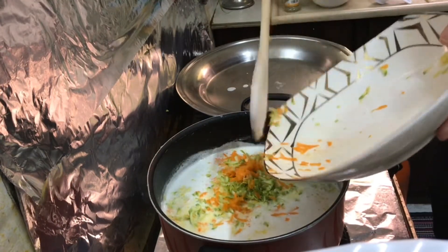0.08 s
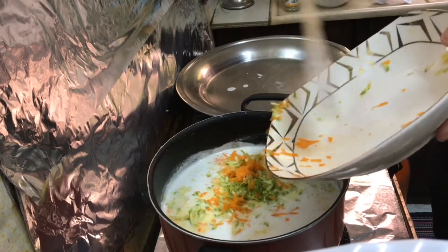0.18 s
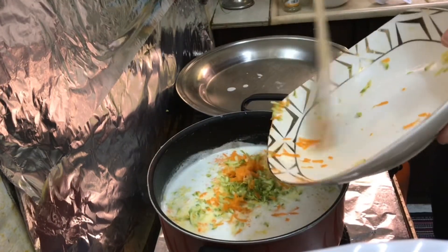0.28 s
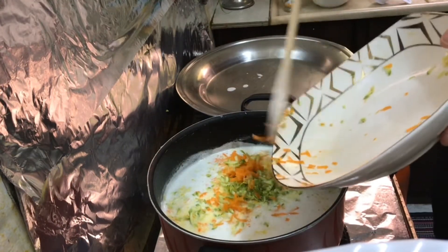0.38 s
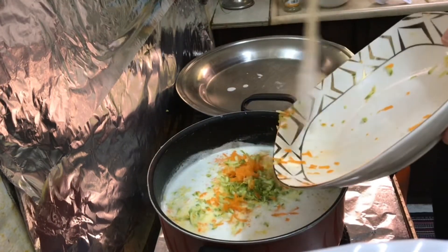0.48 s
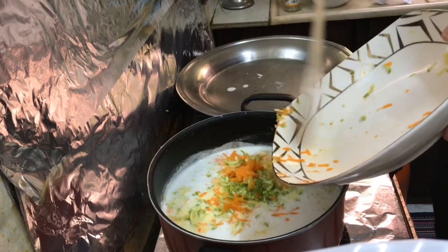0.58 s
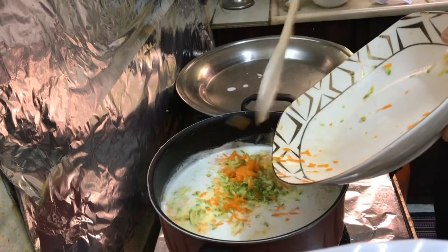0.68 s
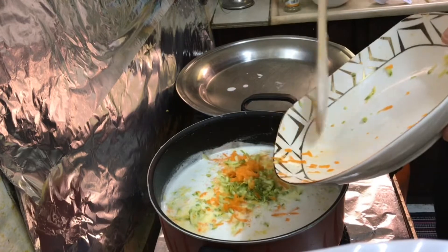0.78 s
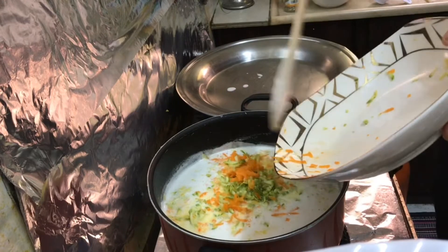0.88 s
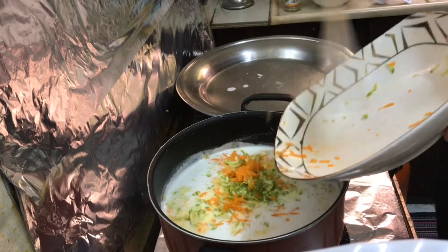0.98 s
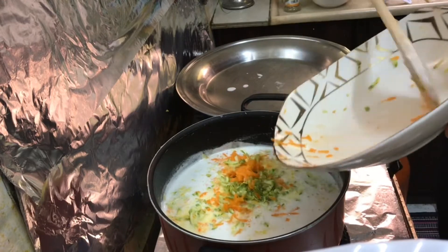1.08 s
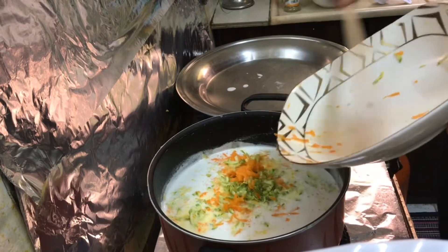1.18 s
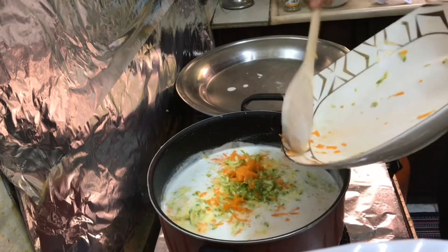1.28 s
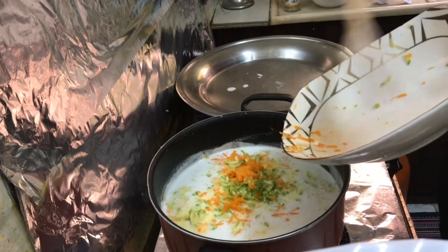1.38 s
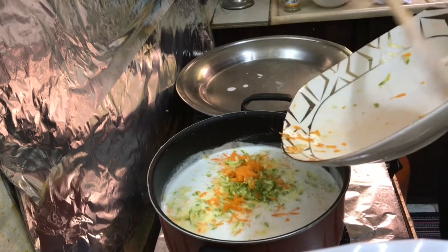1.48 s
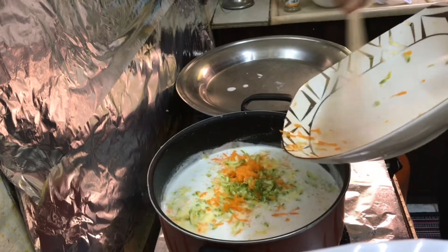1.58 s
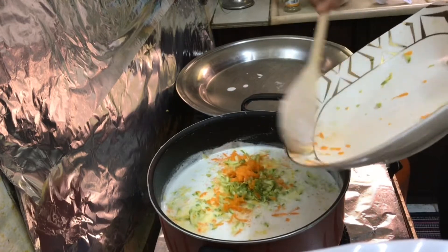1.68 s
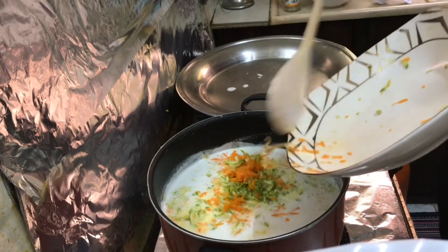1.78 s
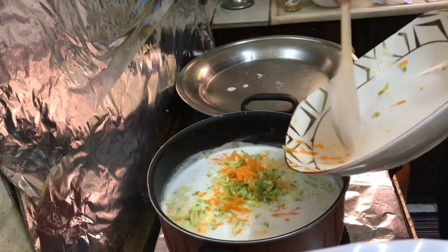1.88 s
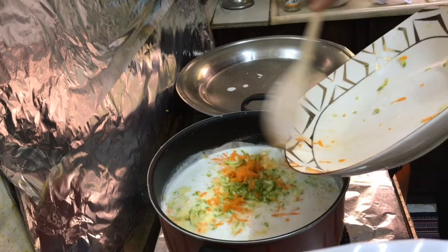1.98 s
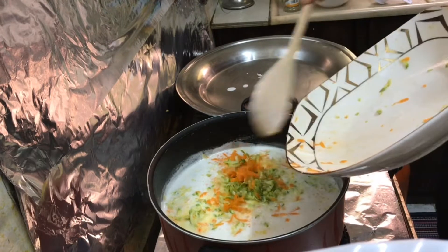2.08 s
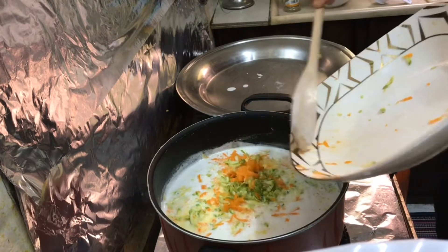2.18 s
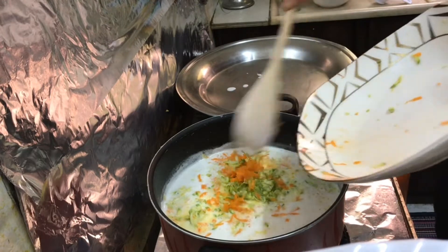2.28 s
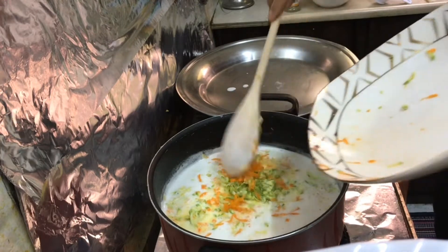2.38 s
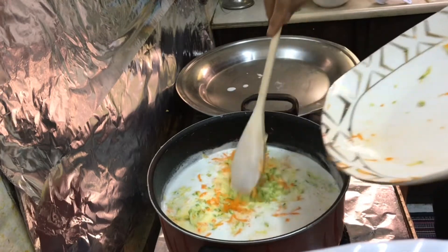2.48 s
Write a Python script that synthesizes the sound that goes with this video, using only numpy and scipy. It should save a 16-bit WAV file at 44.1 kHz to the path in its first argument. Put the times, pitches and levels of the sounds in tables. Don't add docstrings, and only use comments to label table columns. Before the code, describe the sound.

Seven hard knocks of a wooden spoon on a ceramic bowl in a small humming kitchen

```python
import sys
import numpy as np
from scipy import signal
from scipy.fft import rfft, irfft
from scipy.io import wavfile
from scipy.ndimage import uniform_filter1d

SR = 44100
rng = np.random.default_rng(int(sys.argv[2]) if len(sys.argv) > 2 else 0)


def transcribe(signal):
    frames = np.atleast_2d(signal).T
    limited = np.clip(frames, -1, 1)
    pcm = np.round(limited * 32767).astype(np.int16)
    wavfile.write(sys.argv[1], SR, pcm)


def to_linear_factor(level_db):
    exponent = np.asarray(level_db, float) / 20
    return 10 ** exponent


N = 110250

# f/Hz, level/dB rms, wobble/dB
HUM = [(59.3, -55, 2.5), (120.0, -41, .7)]
# f/Hz, width/Hz, level/dB rms
DUCT = [(142, 16, -54), (404, 32, -55), (520, 60, -60), (716, 40, -64)]
# f/Hz, level/dB per Hz
AIR = [(94, 2), (160, 3), (308, -6), (411, -0.5), (453, -1), (719, -7), (942, -12), (1960, -17),
       (16000, -40)]
# t/s, level/dB of the low, middle and high family
TAPS = [
    (.2360, -19, -35.5, -43),
    (.5490, -35, -33, -43.5),
    (0.7939, -48.5, -53, -56.5),
    (1.044, -25, -30, -37),
    (1.455, -35.5, -46.5, -42),
    (1.9062, -27.5, -26, -42.5),
    (2.1632, -26, -35, -43.5),
]
# level/dB of the first, second, third, middle and high family
RIM = [(-44.5, -49.5, -28, -46.5, -39), (-37.5, -35.5, -39, -40, -60), (-43.5, -42, -52, -48, -73),
       (-41.5, -41, -54, -32, -63), (-41, -48, -31, -28, -33.5), (-51, -52, -52, -40, -39),
       (-33, -25.5, -24, -22.5, -29.5)]
# crack level/dB, crack top f/Hz, contact/ms
CONTACT = [(-10.5, 3800, 1.27), (-14, 6900, 0.68), (-26, 7000, 0.31), (-16, 8700, 0.77),
           (-13.5, 5300, 0.83), (-23.5, 8300, 0.82), (-19, 11500, 1.54)]
# thud f/Hz, thud level/dB, knock level/dB, clack level/dB
SPOON = [(727, -15, -16, -14.5), (729, -15, -12.5, -4.5), (638, -19.5, -15.5, -30), (630, -20.5, -30, -12),
         (656, -16.5, -21.5, -46), (719, -17.5, -15.5, -48), (674, -9, -15.5, -19)]
# f/Hz, t60/s
BOWL = [
    [(2278, .24), (2302, .24), (2326, .27), (2350, .2), (2398, .12), (2482, .17), (2579, .13)],
    [(3020, .12), (3605, .15), (3714, .2), (3756, .15), (3792, .2), (3820, .27), (3854, .2)],
    [(5717, .16), (6026, .16), (6058, .2), (6640, .1), (7040, .14), (8436, .12), (9260, .12), (9540, .15)],
    [(1147, .2), (1180, .5), (1188, .3)],
    [(1782, .2), (1804, .33), (1837, .22)],
    [(2480, .1), (2530, .33)],
    [(3398, .15), (3428, .24), (3512, .12), (4417, .24)],
    [(5368, .1), (5402, .12), (5575, .17), (8157, .13), (11100, .1), (12700, .08)],
]
BOWL_SHARE = [
    [-3, -2, -2, -7, -8, -6, -12],
    [-10, -13, -7, -11, -6, 0, -9],
    [-5, -5, 0, -8, -10, -12, -14, -16],
    [-8, 0, -4],
    [-8, 0, -6],
    [-2, 0],
    [-12, 0, -18, -12],
    [-4, 0, -7, -6, -22, -20],
]
# extra level/dB, t60/s
FIRST_SWING = [(8, 0.071), (11, 0.049), (8.5, 0.055), (14.5, 0.021), (10, 0.014), (-7, .04), (-0.5, 0.11),
               (15.5, 0.013)]
# f/Hz, level/dB, t60/s
SPOON_KNOCK = [(362, -12, .07), (870, -4, .04), (1250, -2, .022), (1480, 0, .02)]
SPOON_CLACK = [(3050, -1, .016), (3450, -1, .015), (3900, -5, .012), (5300, -11, .015), (7400, -11, .012)]
# t/s, level/dB
GRAZES = [
    (.7685, -52),
    (1.873, -59),
    (2.1450, -49),
]
# f/Hz, width/Hz, level/dB, t60/s
KITCHEN = [(285, 600, -7, 0.12), (702, 690, -2.5, 0.26), (570, 58, 3.5, 0.24), (1296, 760, -9.5, .33),
           (2400, 1400, -15, .3), (5180, 4240, -7, 0.26), (10400, 6600, -9, 0.2), (14640, 6000, -43, 0.067)]
# f/Hz, width/Hz, depth/0-1
MIC_DIPS = [(1020, 220, .5), (2000, 200, .3), (10500, 1500, .35)]


def level(x, db):
    return x * to_linear_factor(db) / np.sqrt(np.mean(x ** 2))


def band(x, hz, width):
    edges = [max(hz - width / 2, 5), min(hz + width / 2, SR / 2.1)]
    return signal.sosfilt(signal.butter(2, edges, "bandpass", fs=SR, output="sos"), x)


def walk(rate):
    hold = int(SR / rate)
    steps = np.repeat(rng.standard_normal(N // hold + 1), hold)
    return 1.5 * uniform_filter1d(uniform_filter1d(steps, hold), hold)[:N]


def add(out, x, at_s):
    i = int(at_s * SR)
    out[i:i + len(x)] += x[:len(out) - i]


def fan_hum():
    t = np.arange(N) / SR
    out = np.zeros(N)
    for hz, db, wobble_db in HUM:
        strength = np.sqrt(2) * to_linear_factor(db + wobble_db * walk(9))
        out += strength * np.sin(2 * np.pi * hz * t + .3 * walk(6))
    return out


def fan_duct():
    out = sum(level(band(rng.standard_normal(N), hz, width), db) for hz, width, db in DUCT)
    rumble = band(band(rng.standard_normal(N), 71.3, 53), 71.3, 52)
    return out + level(rumble, -57)


def fan_air():
    flicker_db = 1.0
    hz = np.fft.rfftfreq(N, 1 / SR)
    at_hz, air_db = np.array(AIR).T
    shape = to_linear_factor(np.interp(np.log(hz + 1), np.log(at_hz), air_db))
    shape = shape * np.minimum(hz / 130, 1) ** 3
    octave = np.log2(np.maximum(hz, 100) / 100)
    air = np.zeros(N)
    for k in range(9):
        share = np.sqrt(np.clip(1 - abs(octave - k), 0, 1))
        noise = irfft(rfft(rng.standard_normal(N)) * shape * share, N)
        air += to_linear_factor(flicker_db * walk(7.96)) * noise
    return level(air, -44.5)


def fan():
    return fan_hum() + fan_duct() + fan_air()


def crack(t, db, top_hz):
    t60_s = 0.028
    burst = rng.standard_normal(len(t)) * to_linear_factor(db - 60 * t / t60_s)
    return signal.lfilter(*signal.butter(1, [700, min(top_hz, 18000)], "bandpass", fs=SR), burst)


def ring(modes, db, t, first=(-99, .01)):
    scatter_db = 1
    hz, mode_db, t60 = np.array(modes).T[:, :, None]
    gain = to_linear_factor(db + mode_db + scatter_db * rng.standard_normal(hz.shape))
    first_db, first_t60 = first
    fade = to_linear_factor(-60 * t / t60) + to_linear_factor(first_db - 60 * t / first_t60)
    return np.sum(gain * np.sin(2 * np.pi * hz * t) * fade, axis=0)


def wood(t, thud_hz, thud_db, knock_db, clack_db):
    thud = ring([(thud_hz, 0, 0.034)], thud_db, t)
    return thud + ring(SPOON_KNOCK, knock_db, t) + ring(SPOON_CLACK, clack_db, t)


def bowl(t, family_db):
    out = np.zeros(len(t))
    for modes, shares, db, first in zip(BOWL, BOWL_SHARE, family_db, FIRST_SWING):
        family = [(hz, share_db, t60) for (hz, t60), share_db in zip(modes, shares)]
        out += ring(family, db, t, first)
    return out


def taps():
    out, t = np.zeros(N), np.arange(SR // 2) / SR
    for (at_s, *flank), rim, (crack_db, top_hz, contact_ms), spoon in zip(TAPS, RIM, CONTACT, SPOON):
        onset = 1 - np.exp(-(1000 * t / contact_ms) ** 2)
        blow = bowl(t, [*flank, *rim]) + wood(t, *spoon) + crack(t, crack_db, top_hz)
        add(out, onset * blow, at_s)
    return out


def grazes():
    out, t = np.zeros(N), np.arange(800) / SR
    peak_s, width_s = .004, .0015
    for at_s, db in GRAZES:
        scrape = np.diff(rng.standard_normal(801))
        add(out, to_linear_factor(db) * scrape * np.exp(-((t - peak_s) / width_s) ** 2), at_s - peak_s)
    return out


def kitchen(x):
    gap_s, rise_s = .004, .004
    t = np.arange(SR // 2) / SR
    rise = 1 - np.exp(-np.maximum(t - gap_s, 0) / rise_s)
    response = np.zeros(len(t))
    for hz, width, db, t60 in KITCHEN:
        tail = band(rng.standard_normal(len(t)), hz, width) * rise * to_linear_factor(-60 * t / t60)
        response += level(tail, db) * np.sqrt(2 * width / SR / len(t))
    return signal.fftconvolve(x, response)[:N]


def scene():
    close = taps() + grazes()
    return (close + kitchen(close) + fan())[None]


def band_limit(x):
    return signal.sosfilt(signal.butter(12, 16780, fs=SR, output="sos"), x)


def record(dry):
    for hz, width, depth in MIC_DIPS:
        dry = dry - min(depth, 1) * signal.lfilter(*signal.iirpeak(hz, hz / width, SR), dry)
    mix = signal.sosfilt(signal.ellip(8, .2, 70, 15900, fs=SR, output="sos"), dry)
    return band_limit(mix)


dry = scene()
out = record(dry)
transcribe(out)
```